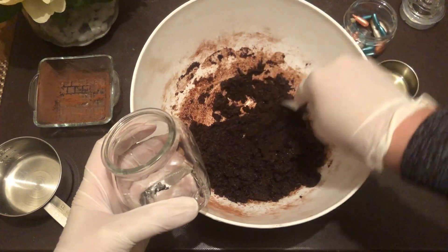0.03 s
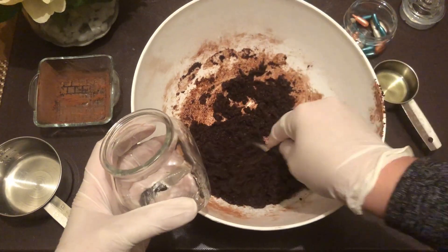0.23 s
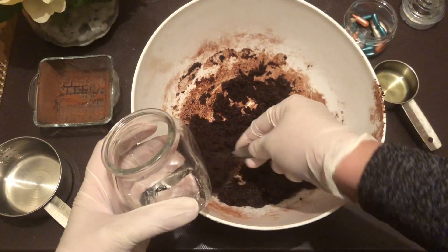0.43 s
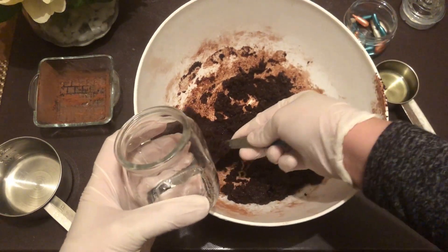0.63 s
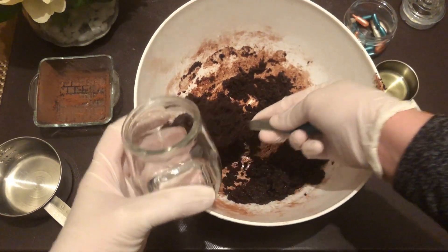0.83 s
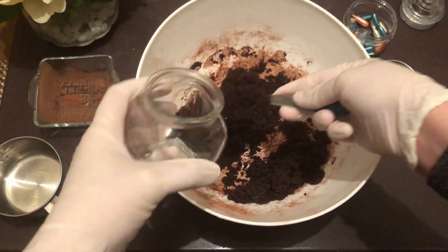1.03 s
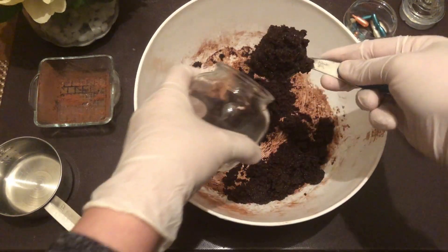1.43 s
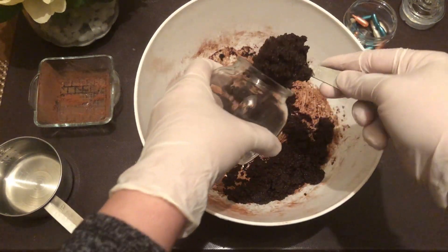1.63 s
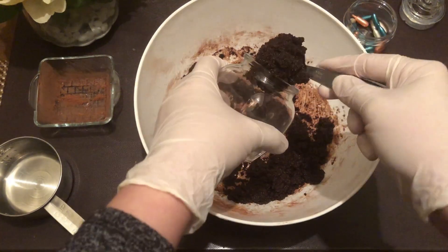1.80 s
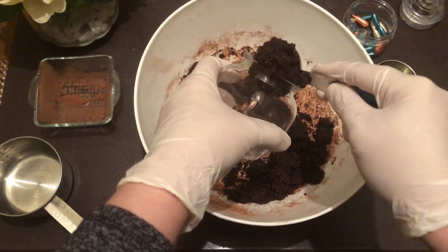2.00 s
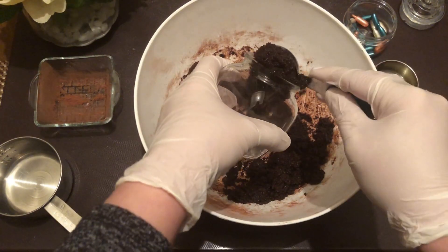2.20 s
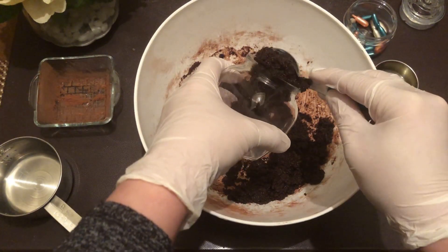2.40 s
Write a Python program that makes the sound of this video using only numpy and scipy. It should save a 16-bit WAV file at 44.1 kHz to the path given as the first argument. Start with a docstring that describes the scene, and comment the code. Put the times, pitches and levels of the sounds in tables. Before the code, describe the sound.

Gritty spoon scraping in a bowl of moist scrub, then faint ticks of falling crumbs.

```python
"""A metal spoon digs into a damp, grainy scrub in a ceramic bowl, close to the microphone.
Grains shear and crack, the spoon knocks on the bowl twice, and clumps crunch; all of it rings the bowl.
As a heap is lifted away, crumbs tick and trickle, and bowl and hands bump softly on the table.
Something whistles faintly over the hum and hiss of a quiet room."""
import sys
import numpy as np
from scipy import signal
from scipy.fft import rfft, irfft
from scipy.io import wavfile
from scipy.ndimage import uniform_filter1d, map_coordinates

SR = 44100
rng = np.random.default_rng(int(sys.argv[2]) if len(sys.argv) > 2 else 0)


def unload_wav(signal):
    """Save mono or channel-first audio to the path in sys.argv[1] as 16-bit WAV at rate SR, clipped to [-1, 1]."""
    wavfile.write(
        sys.argv[1],
        SR,
        np.round(np.clip(np.atleast_2d(signal).T, -1, 1) * 32767).astype(np.int16),
    )


N = 112454
T = np.arange(N) / SR

# Grinding envelopes. Each row: time in seconds, level in dB.
GRIT_ENVELOPE = [(0, -48.5), (.03, -55.5), (.07, -59), (.115, -45), (.128, -22.5), (.16, -19.5),
                 (.22, -25.5), (.255, -25.5), (.30, -24), (.325, -33), (.36, -30.5), (.40, -33.5),
                 (.47, -33), (.505, -31), (.54, -28.5), (.572, -30.5), (.615, -26.5), (.66, -33),
                 (.715, -36), (.765, -45), (.84, -48), (.96, -44.5), (1.02, -54.5), (1.09, -54), (1.2, -61),
                 (1.28, -58), (1.34, -66)]
FIZZ_ENVELOPE = [(0, -57.5), (.06, -61), (.115, -52.5), (.128, -15), (.16, -27), (.22, -25.5), (.26, -31.5),
                 (.30, -33.5), (.325, -39), (.41, -42), (.47, -36.5), (.53, -34), (.575, -33.5), (.61, -34),
                 (.66, -36), (.715, -40.5), (.77, -58), (.83, -54.5), (.93, -50), (.99, -51.5), (1.04, -63),
                 (1.14, -58.5), (1.3, -63.5)]
RUB_ENVELOPE = [(0, -54), (.115, -57), (.128, -21.5), (.19, -27), (.22, -35), (.255, -30), (.30, -31.5),
                (.335, -38.5), (.39, -36), (.43, -40), (.47, -42), (.505, -31.5), (.56, -40.5),
                (.59, -33.5), (.645, -35.5), (.71, -44), (.78, -53), (1.0, -55), (1.2, -60)]
# Grinding spectra, spoon digging or lying flat. Each row: frequency in Hz, relative level in dB.
GRIT_DIG_SPECTRUM = [(300, -22), (900, -8), (1200, -9), (1400, -11), (1850, 0), (2400, 0.5), (2900, -4.5),
                     (3500, -3.5), (4400, -6), (5300, -21), (7500, -12), (15000, -45.5)]
GRIT_FLAT_SPECTRUM = [(300, -34), (900, -15), (1200, -12.5), (1450, -16.5), (1900, -1.5), (2500, -0.5),
                      (3000, -7), (3600, -3), (4400, -6), (5200, -13), (7500, -12.5), (15000, -52)]
RUB_DIG_SPECTRUM = [(30, -6), (70, -9.5), (150, 2.5), (300, -6), (480, -1.5), (700, 5.5), (800, -10),
                    (900, -28), (1300, -15.5), (4000, -61)]
RUB_FLAT_SPECTRUM = [(30, -19), (140, -12), (245, 5.5), (310, 4), (460, 5.5), (640, 2), (790, -3),
                     (900, -20.5), (1300, -23), (4000, -62)]
FIZZ_SPECTRUM = [(1000, -56.5), (3500, -8.5), (5300, -1), (6300, -3), (7400, -8.5), (9300, -5.5),
                 (10500, -8), (12500, -8), (15500, -14)]


def grinding(turn_mid_s=0.45, turn_length_s=0.091):
    """Grains shear past the turning spoon: grit, fine fizz and a dull rub passed on by the bowl."""
    coarse, fine = grains(per_s=6500), grains(per_s=12000)
    flat = np.clip((T - turn_mid_s) / turn_length_s + .5, 0, 1)
    digging = 1 - flat
    cracks = amp(-8.5) * unit(grains(per_s=760, spread_db=2.2)) * digging  # large grains
    grit = digging * colour(unit(coarse) + cracks, GRIT_DIG_SPECTRUM)
    grit += flat * colour(coarse, GRIT_FLAT_SPECTRUM)
    fizz = colour(unit(coarse + fine) + cracks, FIZZ_SPECTRUM)
    rub = digging * colour(coarse, RUB_DIG_SPECTRUM) + flat * colour(coarse, RUB_FLAT_SPECTRUM)
    scrape = grit * envelope(GRIT_ENVELOPE) + fizz * envelope(FIZZ_ENVELOPE)
    return pockets(scrape) + rub * envelope(RUB_ENVELOPE)


def grains(per_s, spread_db=2.5):
    """Random grain fractures: many small, a few large."""
    impulses = (rng.random(N) < per_s / SR) * rng.choice([-1., 1.], N)
    return impulses * amp(spread_db * np.minimum(rng.exponential(1, N), 5))


def pockets(x, depth_db=2, patch_hz=326, patch_s=0.039):
    """Pockets between the grains form and collapse, so the colour keeps shifting."""
    frames = dict(nperseg=512, noverlap=384)
    hz, _, spectra = signal.stft(x, SR, **frames)
    times = np.linspace(0, N / SR, spectra.shape[1])
    grid = np.meshgrid(hz / patch_hz, times / patch_s, indexing="ij")
    patches = map_coordinates(rng.standard_normal((1024, 1024)), grid, order=1, mode="wrap")
    gain = unit(amp(depth_db * unit(patches)))
    return signal.istft(spectra * gain, **frames)[1][:N]


# Spoon impacts. Each row: start in seconds, hold in seconds, click level in dB, thud level in dB.
KNOCK_HITS = [(.1180, 0.006, -2, -15), (0.2281, 0.0017, -6.5, -29), (0.231, 0.0037, -3, -14.5),
              (0.2369, 0.0016, -2, -19.5)]
# Click spectrum. Each row: frequency in Hz, relative level in dB.
KNOCK_SPECTRUM = [(35, -39), (60, -8.5), (509, -3.5), (1070, -3.5), (1700, -2), (3150, -1.5), (3670, -4.5),
                  (4630, -3.5), (5500, -2), (6560, -8.5), (9300, -4), (10400, -9.5), (11700, -6.5),
                  (15500, -9.5)]


def knocks():
    """The spoon jars on the bowl with grains trapped under its edge."""
    out = np.zeros(N)
    for start_s, hold_s, click_db, thud_db in KNOCK_HITS:
        add(out, start_s, amp(click_db) * burst(KNOCK_SPECTRUM, hold_s, fall_s=0.00072))
        add(out, start_s, amp(thud_db) * thud())
    return out


# Breaking clumps. Each row: start in seconds, hold in seconds, grit, fizz and thud levels in dB.
CLUMP_BREAKS = [(.129, 0.0042, -33, -20, -38), (0.164, 0.00069, -27, -22, -35),
                (0.182, 0.0014, -18, -22, -24), (0.197, 0.0011, -20, -27, -45),
                (.2405, .004, -22, -22, -19.5), (0.2716, 0.00076, -27, -29.5, -39),
                (0.294, 0.0012, -25, -33, -50), (0.306, 0.0027, -20.5, -24, -26.5),
                (0.3794, 0.0023, -23.5, -26.5, -58), (0.41, 0.0038, -28.5, -37, -30),
                (.423, .001, -30.5, -25.5, -56), (0.4336, 0.0043, -23.5, -40, -31),
                (.449, 0.0036, -28, -35, -48), (.484, .0029, -23, -44, -44),
                (0.4882, 0.0029, -18.5, -24.5, -22.5), (0.4931, 0.0019, -17, -20, -22.5),
                (0.5781, 0.0021, -24, -21, -26.5), (0.584, 0.0012, -15, -11.5, -20),
                (.591, 0.00069, -29, -13, -19), (.597, 0.0022, -27, -17.5, -30)]
# Crunch spectra. Each row: frequency in Hz, relative level in dB.
CLUMP_GRIT_SPECTRUM = [(300, -44), (900, -20.5), (1500, -7.5), (2100, 1), (2600, 0.5), (3100, -8.5),
                       (4000, -6.5), (5000, -39), (15000, -30.5)]
CLUMP_FIZZ_SPECTRUM = [(500, -59.5), (2500, -8), (4000, 1), (6000, 2), (7500, -8.5), (9300, 0),
                       (12000, -13.5), (15500, -19)]


def crunches(fall_s=0.0014):
    """The spoon slips as clumps break."""
    out = np.zeros(N)
    for start_s, hold_s, grit_db, fizz_db, thud_db in CLUMP_BREAKS:
        add(out, start_s, amp(grit_db) * burst(CLUMP_GRIT_SPECTRUM, hold_s, fall_s))
        add(out, start_s, amp(fizz_db) * burst(CLUMP_FIZZ_SPECTRUM, hold_s, fall_s))
        add(out, start_s, amp(thud_db) * thud())
    return out


# Damped modes of the filled bowl. Each row: nominal frequency in Hz, relative level in dB.
THUD_MODES = [(340, -4.5), (430, -2), (525, 2.5), (700, -3)]


def thud(rise_s=0.00064, fall_s=0.0063, detune=0.016):
    """The filled bowl's quickly damped low answer, a little different for every blow."""
    t = T[:4096]
    shape = (1 - np.exp(-t / rise_s)) * np.exp(-t / fall_s)
    tones = np.zeros(len(t))
    for hz, db in THUD_MODES:
        detuned_hz = hz * (1 + detune * rng.uniform(-0.61, 1))
        tones += amp(db) * np.sin(2 * np.pi * (detuned_hz * t + rng.random()))
    return unit(tones * shape) * rms(shape) / shape.max()


# Bowl and spoon modes. Each row: frequency in Hz, relative level in dB, T60 in seconds.
BOWL_MODES = [(243, -3, .5), (366, -2, .35), (464, -5, .35), (490, -6, .3), (661, -3, .25), (688, -2.5, .3),
              (780, -7, .3), (1200, -5, .06), (1500, -2, .06), (1750, -4, .22), (1845, 1, .3),
              (2038, -5, .25), (2133, -3, .25), (2700, -5, .25), (3088, -1, .3), (3170, 3, .3),
              (3623, -7, .3), (3900, -7, .3), (4140, -5, .25), (4450, -4, .25), (4550, 1, .25),
              (5185, -4, .25), (5343, -4, .25)]
# Modes rung by the last shove. Each entry: frequency in Hz.
LOW_MODES_HZ = (243, 464, 780)


def bowl(x, ring_db=0.5):
    """Adds the ringing of the bowl and spoon to what excites them."""
    t = T[:SR // 2]
    ring = np.zeros(len(t))
    for hz, db, t60_s in BOWL_MODES:
        unity_peak = 2 * np.log(1000) / (t60_s * SR)
        ring += unity_peak * amp(db - 60 * t / t60_s) * np.cos(2 * np.pi * hz * t)
    return x + amp(ring_db) * signal.fftconvolve(x, ring)[:N]


def low_ring(start_s=0.5886, gain_db=-28):
    """The last shove sets three low modes of the bowl ringing as the spoon lifts clear."""
    t = np.maximum(T - start_s, 0)
    return sum(amp(gain_db + db - 60 * t / t60_s) * np.sin(2 * np.pi * hz * t)
               for hz, db, t60_s in BOWL_MODES if hz in LOW_MODES_HZ)


# Crumbs and small touches. Each row: start in seconds, level in dB, tilt in dB per octave.
TICK_HITS = [(1.0595, -47, 6), (1.082, -38, -7.5), (1.088, -42.5, 8), (1.0975, -37, -9), (1.1645, -30, -1),
             (1.18, -42, -2), (1.278, -44.5, -2), (1.428, -50.5, 6.5), (1.489, -53, 5), (1.5478, -47, 3),
             (1.898, -38, -9), (2.027, -55, -11), (2.066, -45.5, 17), (2.443, -41, 6), (2.466, -50.5, 9),
             (2.483, -49, 10), (2.515, -49, -4)]
# Tick spectrum before tilt. Each row: frequency in Hz, relative level in dB.
TICK_SPECTRUM = [(20, -80), (300, -11), (1500, -15.5), (3000, 3), (4500, 1.5), (7000, -1), (11000, -7.5),
                 (15500, -9)]


def ticks():
    """Crumbs drop and gloves brush while the heap is carried away."""
    out = np.zeros(N)
    for start_s, db, tilt in TICK_HITS:
        tick = burst(TICK_SPECTRUM, hold_s=0.00037, fall_s=0.0017, db_per_octave=tilt)
        add(out, start_s, amp(db) * tick)
    return highpass(out, hz=500)


# Runs of crumbs. Each row: start in seconds, length in seconds, level in dB.
TRICKLE_RUNS = [(1.40, .17, -64), (2.048, .04, -67.5), (2.432, 0.039, -55)]
# Trickle spectrum. Each row: frequency in Hz, relative level in dB.
TRICKLE_SPECTRUM = [(1000, -38), (4000, -9), (8000, 8), (11000, -8), (15500, -1)]


def trickles():
    """Loose crumbs trickle in short, bright runs."""
    return sum(swell(*run) for run in TRICKLE_RUNS) * colour(grains(per_s=1100), TRICKLE_SPECTRUM)


# Low bumps. Each row: start in seconds, length in seconds, centre frequency in Hz, level in dB.
TABLE_BUMPS = [(0.124, 0.035, 59.5, -34), (0.135, 0.027, 168.6, -40), (0.219, 0.03, 69.6, -49),
               (0.412, 0.048, 135, -34.5), (0.457, 0.047, 74.2, -39.5), (0.598, 0.045, 65, -47),
               (0.92, 0.098, 142.6, -50), (1.115, 0.098, 150, -46.5), (1.235, 0.063, 150, -49.5)]


def bumps(wander_hz=11):
    """Bowl and hands bump softly on the table: low swells of unsteady pitch."""
    out = np.zeros(N)
    for start_s, length_s, hz, db in TABLE_BUMPS:
        pitch_hz = hz + wander_hz * fuzzy_tone(np.zeros(N), width_hz=22)
        tone = np.sqrt(2) * np.sin(2 * np.pi * np.cumsum(pitch_hz) / SR)
        out += swell(start_s, length_s, db) * tone
    return out


# Whistle contour. Each row: time in seconds, pitch in Hz, level in dB.
WHISTLE_CONTOUR = [(1.865, 1900, -64), (1.891, 2100, -60), (1.92, 2280, -55.5), (1.949, 2437, -55),
                   (1.99, 2360, -57), (2.03, 2390, -64), (2.07, 2460, -65.5), (2.12, 2480, -77)]
# Chirps. Each row: start in seconds, length in seconds, centre pitch in Hz, level in dB.
WHISTLE_CHIRPS = [(1.889, 0.033, 4270, -48), (2.018, .022, 4270, -47.5), (2.209, .016, 4340, -55)]


def whistles(width_hz=190, chirp_rise_hz_per_s=3000):
    """A faint rising whistle and three higher chirps, each chirp with a little rubbing noise."""
    times, pitches_hz, levels_db = np.transpose(WHISTLE_CONTOUR)
    out = fuzzy_tone(np.interp(T, times, pitches_hz), width_hz)
    out *= amp(np.interp(T, times, levels_db, left=-120, right=-120))
    for start_s, length_s, hz, db in WHISTLE_CHIRPS:
        t = np.arange(0, length_s, 1 / SR)
        tone = fuzzy_tone(hz + chirp_rise_hz_per_s * (t - length_s / 2), width_hz)
        rubbing = amp(-10) * noise(len(t), GRIT_DIG_SPECTRUM)
        add(out, start_s, amp(db) * np.sin(np.pi * t / length_s) * (tone + rubbing))
    return out


def room(x, tail_db=-18.5, rise_s=0.0032, t60_s=0.22):
    """Adds a short, weak tail from the table and walls."""
    t = T[:SR // 2]
    tail = noise(len(t), [(100, 6), (3000, -1), (8000, 0.5), (15000, -18)])
    tail *= np.minimum(t / rise_s, 1) * amp(-60 * t / t60_s)
    return x + amp(tail_db) * signal.fftconvolve(x, tail / np.linalg.norm(tail))[:N]


# Room noise spectra. Each row: frequency in Hz, relative level in dB.
AIR_SPECTRUM = [(25, -42), (55, -9), (77, 0), (104, -9), (152, 2), (221, -3), (389, -5.5), (421, -7.5),
                (457, -14.5), (537, -11), (741, -15.5), (997, -16), (3930, -36), (4750, -21.5), (5580, -28),
                (15500, -60)]
HISS_SPECTRUM = [(3000, -38), (4150, -18), (4350, -2.5), (4750, 4), (4970, 2), (5080, -18), (7000, -38)]
# Hum tones. Each row: frequency in Hz, level in dB.
HUM_TONES = [(72, -61.5), (150.7, -58.5), (267, -65.5), (301.5, -73), (395, -69), (454, -61.5),
             (511, -70.5), (732, -66)]


def background(air_db=-50, hiss_db=-60.5):
    """Room air, a wavering hum and a thin band of hiss."""
    air = amp(air_db) * noise(N, AIR_SPECTRUM)
    hum = sum(amp(db) * fuzzy_tone(np.full(N, hz), width_hz=2.3) for hz, db in HUM_TONES)
    hiss = noise(N, HISS_SPECTRUM)
    waver_db = 0.5 * fuzzy_tone(np.zeros(N), width_hz=8.7)
    return air + hum + hiss * amp(hiss_db + waver_db)


def amp(db):
    """Decibels to gain."""
    return 10 ** (np.asarray(db) / 20)


def rms(x):
    """Root mean square, never zero."""
    return np.sqrt(np.mean(x ** 2) + 1e-20)


def unit(x):
    """Scales to an rms of one."""
    return x / rms(x)


def envelope(points):
    """Gain curve through (s, dB) points."""
    return amp(np.interp(T, *np.transpose(points)))


def swell(start_s, length_s, db):
    """Half-sine arch of gain."""
    return amp(db) * np.sin(np.pi * np.clip((T - start_s) / length_s, 0, 1))


def add(mix, start_s, sound):
    """Mixes a sound in place."""
    part = mix[max(round(start_s * SR), 0):][:len(sound)]
    part += sound[:len(part)]


def highpass(x, hz):
    """Second-order low cut."""
    return signal.sosfilt(signal.butter(2, hz, "highpass", fs=SR, output="sos"), x)


def colour(x, spectrum, db_per_octave=0):
    """Filters x by (Hz, dB) points and a tilt; unit rms."""
    octave = np.log2(np.fft.rfftfreq(len(x), 1 / SR) + 1)
    hz, db = np.transpose(spectrum)
    gain_db = np.interp(octave, np.log2(hz), db) + db_per_octave * octave
    return unit(irfft(rfft(x) * amp(gain_db), len(x)))


def noise(samples, spectrum, db_per_octave=0):
    """Coloured noise at unit rms."""
    return colour(rng.standard_normal(samples), spectrum, db_per_octave)


def fuzzy_tone(pitch_hz, width_hz):
    """Narrow noise carried along a pitch curve; at zero pitch, a slow random wander."""
    samples = len(pitch_hz)
    white = rng.standard_normal(samples) + 1j * rng.standard_normal(samples)
    band = np.exp(-2 * (np.fft.fftfreq(samples, 1 / SR) / width_hz) ** 2)
    wander = np.fft.ifft(np.fft.fft(white) * band)
    carrier = np.exp(2j * np.pi * np.cumsum(pitch_hz) / SR)
    return unit((wander * carrier).real)


def burst(spectrum, hold_s, fall_s, db_per_octave=0):
    """A tight cluster of micro-impacts: noise that holds briefly and dies away."""
    t = T[:2048]
    shape = np.exp(-np.maximum(t - hold_s, 0) / fall_s)
    return unit(noise(len(t), spectrum, db_per_octave) * shape) * rms(shape)


def scene():
    """Spoon, bowl and room at one microphone."""
    scoop = bowl(grinding() + knocks() + crunches())
    in_room = room(scoop + ticks() + whistles())
    return (in_room + low_ring() + trickles() + bumps() + background())[None]


def record(dry):
    """Low cut, mild gain control, soft overload, then the band limit."""
    threshold_db, duck_db_per_db, release_db_per_s = -35, 0.12, 25
    ceiling, cutoff_hz = 1.9, 15850
    dry = highpass(dry, hz=31)
    power_db = 10 * np.log10(abs(uniform_filter1d(dry[0] ** 2, size=300)) + 1e-12)
    release_db = T * release_db_per_s
    held_db = np.maximum.accumulate(power_db + release_db) - release_db  # decaying peak hold
    ducked = dry * amp(-duck_db_per_db * np.maximum(held_db - threshold_db, 0))
    saturated = ceiling * np.tanh(ducked / ceiling)
    lowpass = signal.firwin(511, cutoff_hz, window=("kaiser", 8), fs=SR)
    return signal.oaconvolve(saturated, lowpass[None], "same")


dry = scene()
out = record(dry)
unload_wav(out)
```